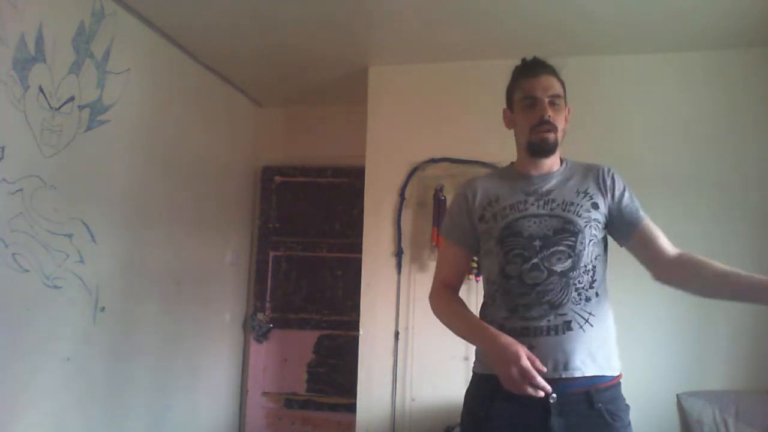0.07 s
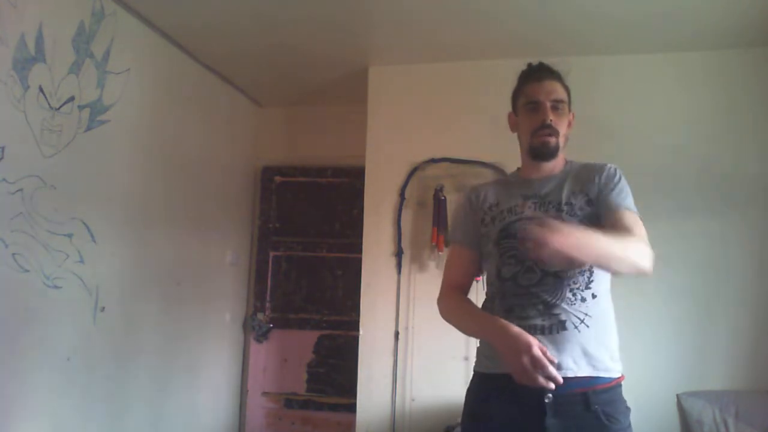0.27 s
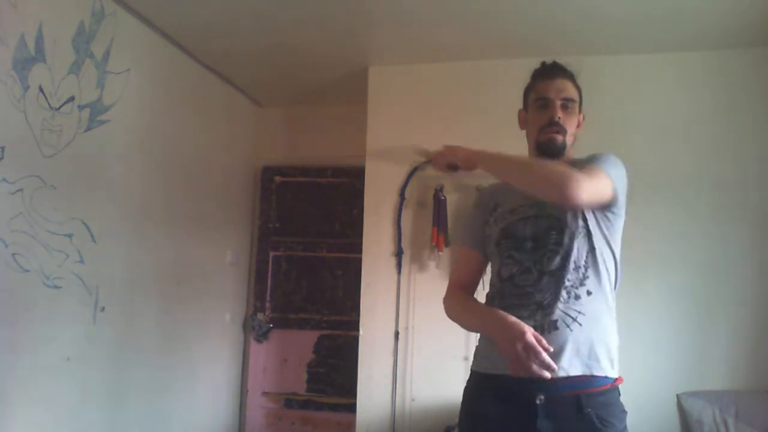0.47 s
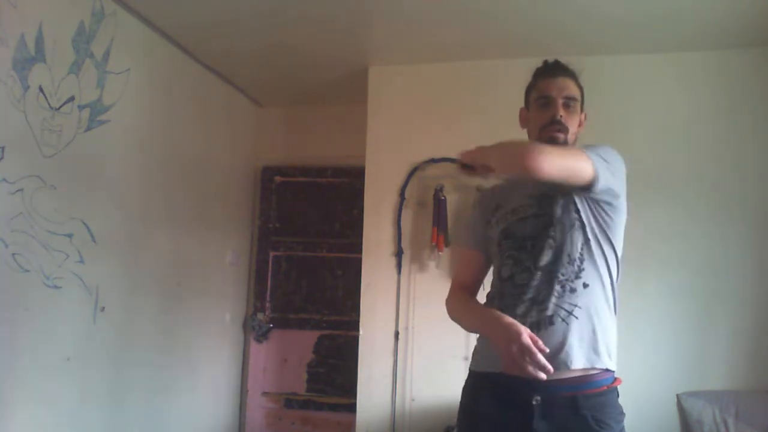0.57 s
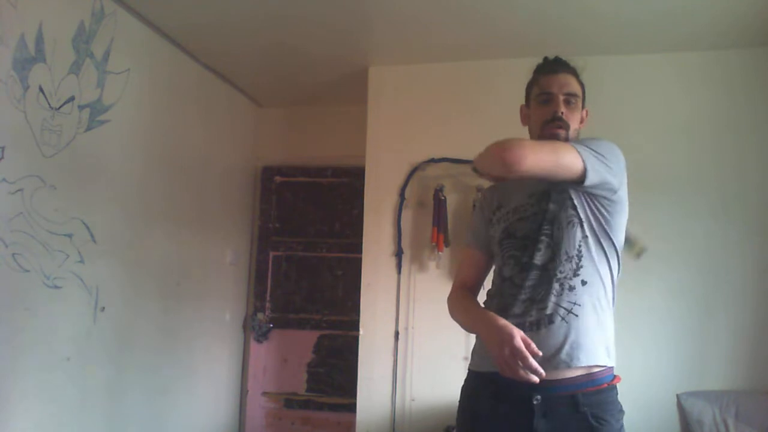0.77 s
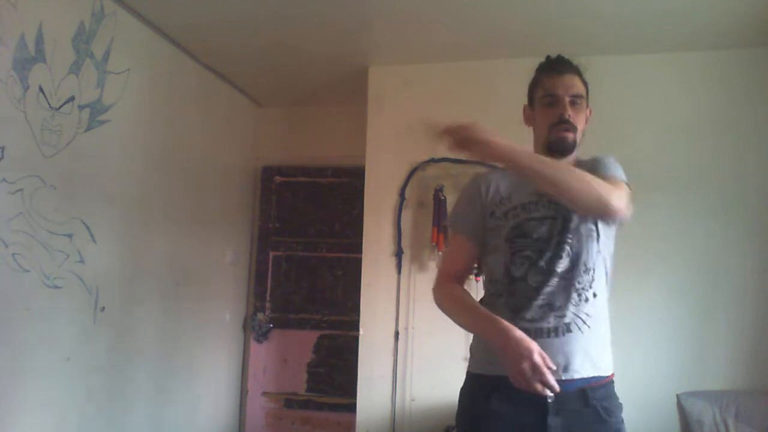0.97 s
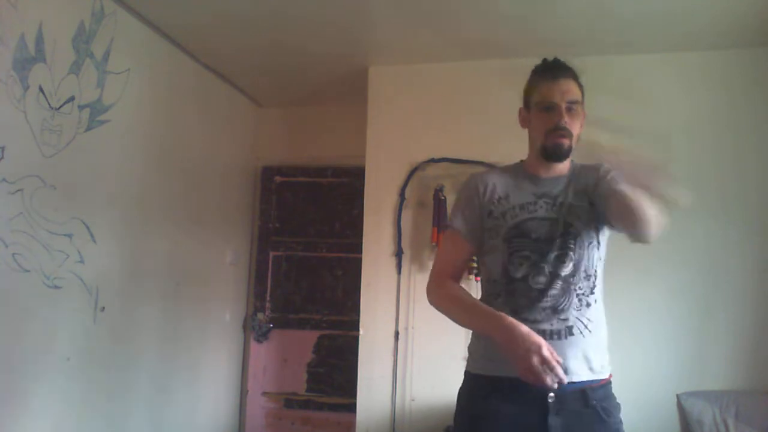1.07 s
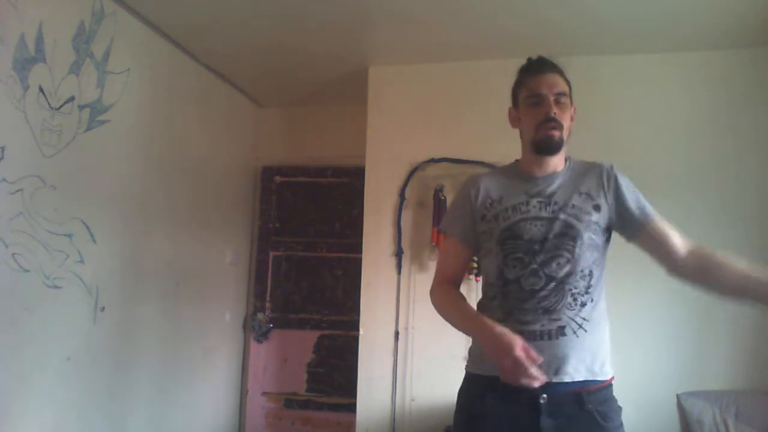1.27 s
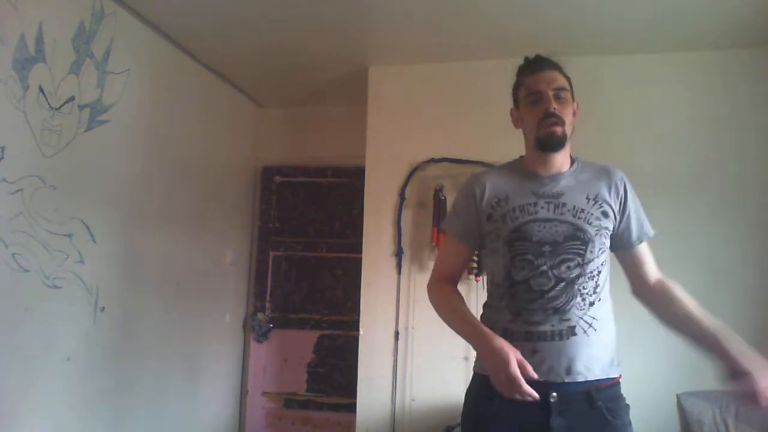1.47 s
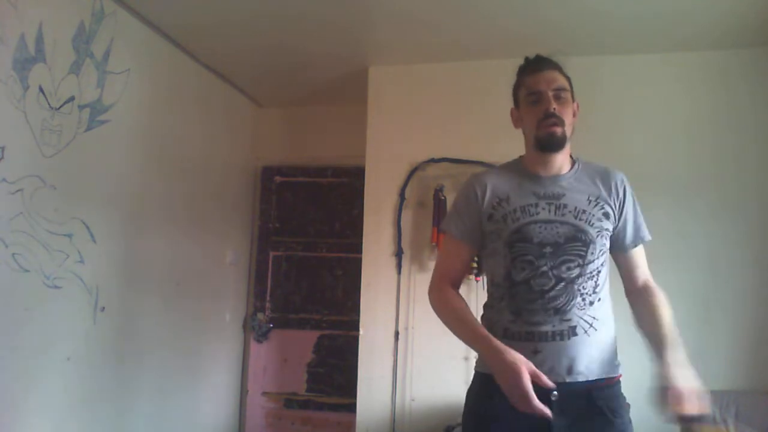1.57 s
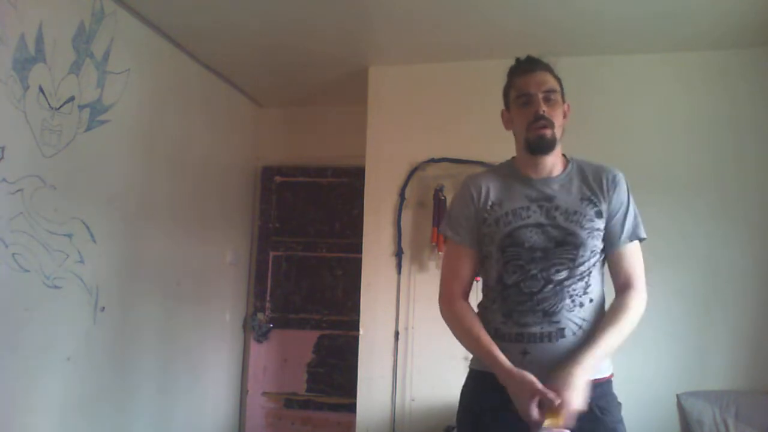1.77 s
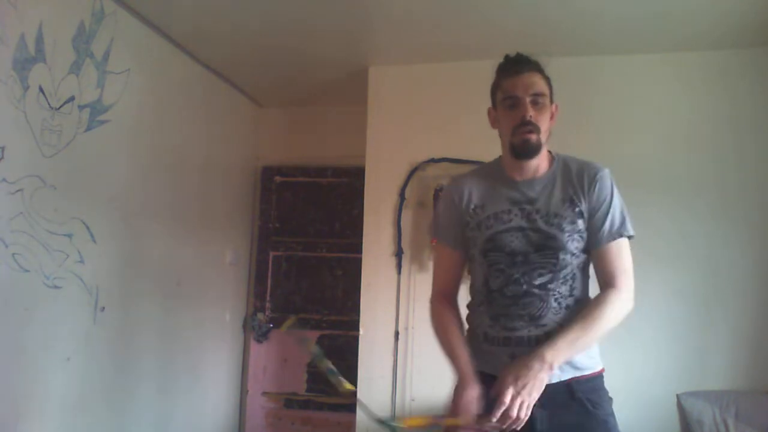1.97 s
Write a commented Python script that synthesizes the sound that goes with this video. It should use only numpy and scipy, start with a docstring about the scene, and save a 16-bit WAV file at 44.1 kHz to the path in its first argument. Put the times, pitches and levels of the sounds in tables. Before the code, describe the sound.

Nunchaku slap sharply against a shirt, then whoosh low through a small room over fan hiss

```python
"""A nunchaku slaps against a shirt, then whooshes back through the air of a small room.
Slap: noise cracks over a low thud. Whoosh: a vortex tone and wake noise that follow the stick's speed.
Cord and handles rub and tick (noise bands); soft low bumps are single pressure dips.
Behind: a fan's rush with faint tones over microphone hiss, very low rumble and a draught."""
import sys
import numpy as np
from scipy import signal
from scipy.fft import rfft, irfft
from scipy.io import wavfile
from scipy.ndimage import uniform_filter1d

SR = 44100
rng = np.random.default_rng(int(sys.argv[2]) if len(sys.argv) > 2 else 0)


def persist_wave(psi):
    """Save psi, clipped to +-1, as 16-bit WAV."""
    counts = np.round(np.clip(psi, -1, 1) * 32767).astype(np.int16)
    wavfile.write(sys.argv[1], SR, np.atleast_2d(counts).T)


N = 88596


def undb(db):
    """Decibels to gain."""
    return 10 ** (np.asarray(db) / 20)


def times():
    """Time of every sample in s."""
    return np.arange(N) / SR


def unit(x):
    """Scale to rms 1."""
    return x / np.sqrt(np.mean(x ** 2))


def bins():
    """Frequency of every spectral bin in Hz, at least 1 so that logs are finite."""
    return np.maximum(np.fft.rfftfreq(N, 1 / SR), 1)


def along_hz(points, hz):
    """Interpolate (f/Hz, value) points on a log-frequency axis."""
    point_hz, values = np.array(points, float).T
    return np.interp(np.log(hz), np.log(point_hz), values)


def filtered_noise(gain):
    """White noise shaped by a gain per spectral bin, rms 1."""
    spectrum = rfft(rng.standard_normal(N))
    return unit(irfft(spectrum * gain, N))


def noise(points):
    """Noise of rms 1 with the colour of (f/Hz, level/dB) points."""
    return filtered_noise(undb(along_hz(points, bins())))


def band(hz, octaves):
    """Noise of rms 1 in a Gaussian bell on a log-frequency axis; octaves is its sigma."""
    return filtered_noise(np.exp(-.5 * (np.log2(bins() / hz) / octaves) ** 2))


def walk(rate_hz):
    """Smooth random drift of rms 1, lowpassed around rate_hz."""
    return filtered_noise(np.exp(-(bins() / rate_hz) ** 2))


def burst(at_s, decay_s):
    """Instant attack and exponential decay."""
    age_s = times() - at_s
    return (age_s >= 0) * np.exp(-np.abs(age_s) / decay_s)


def swell(at_s, rise_s, decay_s):
    """Gaussian rise to a peak of 1, then exponential decay."""
    age_s = times() - at_s
    return np.exp(np.where(age_s < 0, -.5 * (age_s / rise_s) ** 2, -np.abs(age_s) / decay_s))


def room(x, wet_db):
    """Add the diffuse ring of a small bare room: noise that dies octave by octave."""
    # reverberation time: f/Hz, T60/s
    room_t60 = [(150, 0.34), (600, .33), (1500, 0.37), (4000, 0.21), (10000, 0.28)]
    gap_s, length_s = 0.00498, 1
    t = times()
    white = rfft(rng.standard_normal(N))
    octave = np.clip(np.log2(bins() / 125), 0, 7)
    tail = 0
    for k in range(8):
        t60_s = along_hz(room_t60, 125 * 2 ** k)
        octave_noise = irfft(white * np.maximum(1 - np.abs(octave - k), 0), N)
        tail = tail + octave_noise * np.exp(-np.log(1000) * t / t60_s)
    # flatten the broad colour of the ring
    ring = rfft(tail)
    even = ring / np.sqrt(uniform_filter1d(np.abs(ring) ** 2, size=600))
    tail = irfft(even, N) * (t > gap_s) * (t < length_s)
    tail = tail / np.sqrt(np.sum(tail ** 2))
    return x + undb(wet_db) * signal.fftconvolve(x, tail)[:N]


def background():
    """Fan rush and microphone hiss as one coloured noise, with faint wobbling fan tones."""
    # fan and hiss colour: f/Hz, relative level/dB
    floor_colour = [(30, 0.5), (70, -0.5), (130, 5), (215, -4.5), (300, -0.5), (400, -3), (470, 2),
                    (560, 1.5), (680, 0), (900, -2.5), (1200, -5.5), (1600, -9.5), (2200, -17.5),
                    (3200, -18), (4500, -21.5), (10000, -22.5), (15500, -22.5)]
    # fan tones: f/Hz, rms level/dB
    fan_lines = [(328.4, -63.5), (463, -58.5), (646, -59.5), (726.7, -59.5), (834.4, -62.5), (6573, -97),
                 (6600, -73)]
    floor_db, waver_db, waver_rate_hz = -45.5, 0.5, 5.2
    wobble, wobble_rate_hz = .004, 12  # rms wobble as a fraction of f, f capped at 1000 Hz
    tones = 0
    for hz, db in fan_lines:
        line_hz = hz + wobble * min(hz, 1000) * walk(wobble_rate_hz)
        phase = 2 * np.pi * np.cumsum(line_hz) / SR
        tones = tones + undb(db) * np.sqrt(2) * np.sin(phase)
    return undb(floor_db + waver_db * walk(waver_rate_hz)) * noise(floor_colour) + tones


def rumble():
    """Slow rumble at the microphone, plus low noise that swells as the swing's draught arrives."""
    # rumble colour: f/Hz, relative level/dB
    rumble_colour = [(3, 9), (8, 16.5), (14, 7), (22, -15.5), (40, -4.5), (80, -61), (300, -77)]
    # draught colour: f/Hz, relative level/dB
    draught_colour = [(3, -0.5), (7, 1), (13, -6), (22, -24), (40, -30), (80, -37.5), (300, -81)]
    rumble_db, draught_db = -29.5, -15
    draught_s, rise_s, decay_s = 1.11, 0.021, 0.112
    draught = undb(draught_db) * swell(draught_s, rise_s, decay_s) * noise(draught_colour)
    return undb(rumble_db) * noise(rumble_colour) + draught


def bumps():
    """Soft low bumps: each is one dip of pressure, age * exp(1 - age)."""
    # bumps: t/s, peak level/dB
    bump_table = [(0.208, -29.5), (0.294, -32), (0.639, -31), (0.828, -27), (0.859, -28), (0.930, -29),
                  (1.273, -30), (1.279, -30), (1.721, -27), (1.787, -25.5), (1.790, -28), (1.95, -28)]
    time_to_peak_s = 0.0012
    pressure = 0
    for at_s, db in bump_table:
        age = np.maximum(times() - at_s, 0) / time_to_peak_s
        pressure = pressure - undb(db) * age * np.exp(1 - age)
    return pressure


def windup():
    """Slow wind-up swing: the air is a faint low noise band that swells and fades."""
    at_s, rise_s, decay_s = .262, .04, .06
    peak_db, centre_hz, width_octaves = -40, 79, 0.54
    return undb(peak_db) * band(centre_hz, width_octaves) * swell(at_s, rise_s, decay_s)


def handling():
    """Cloth and cord rub as grainy noise bands; cord and handles tick as short bursts."""
    # rubs: t/s, level/dB, rise/s, decay/s, centre f/Hz, width/octaves
    rub_table = [(0.952, -47, 0.013, .02, 10300, 0.52), (1.08, -52, 0.055, 0.044, 9000, 0.65),
                 (1.114, -53.5, 0.024, .04, 4400, 1), (1.50, -64, .14, .17, 3250, 0.14),
                 (1.523, -49, .006, 0.017, 1510, 0.32), (1.525, -57.5, .007, 0.014, 9100, .1),
                 (1.618, -61, 0.031, 0.17, 1690, 0.13), (1.726, -54, 0.006, 0.018, 3930, 0.49),
                 (1.814, -53.5, 0.018, 0.14, 9900, 0.47), (1.868, -56, 0.074, 0.13, 4640, 0.83)]
    # ticks: t/s, level/dB, centre f/Hz
    tick_table = [(0.411, -48, 5000), (0.928, -42, 9050), (1.2593, -44, 4170), (1.515, -49, 6500),
                  (1.709, -37.5, 3800), (1.715, -46, 3300), (1.852, -42, 4200), (1.955, -50, 11600)]
    grain_db, grain_rate_hz = 1.5, 1100
    tick_decay_s, tick_octaves, room_db = 0.0033, 0.51, -3
    rubs = 0
    for at_s, db, rise_s, decay_s, hz, octaves in rub_table:
        rubs = rubs + undb(db) * swell(at_s, rise_s, decay_s) * band(hz, octaves)
    ticks = 0
    for at_s, db, hz in tick_table:
        ticks = ticks + undb(db) * burst(at_s, tick_decay_s) * band(hz, tick_octaves)
    grain = undb(grain_db * walk(grain_rate_hz))
    return room(rubs * grain + ticks, room_db)


def swing():
    """Shed vortices give a tone whose pitch follows speed; the wake noise grows steeply with speed."""
    # wake colour: f/Hz, relative level/dB
    wake_colour = [(60, 4.5), (130, 9.5), (260, 6), (400, -7.5), (600, 1.5), (1100, -6.5), (2000, -16),
                   (4000, -18.5), (8000, -28.5), (14000, -40)]
    fastest_s, speed_up_s, slow_down_s = 1.049, .06, 0.085
    top_speed_hz, pitch_wobble, wobble_rate_hz = 162.4, .055, 85
    vortex_db, octave_db, flutter_db, flutter_rate_hz = -26.5, -19, 2.5, 50
    vortex_s, vortex_half_s, vortex_room_db = 1.051, 0.034, -12
    wake_db, wake_power, air_room_db = -35.5, 4.04, -6
    pass_db, pass_s, pass_length_s, pass_hz, pass_octaves = -36.5, 1.049, 0.0065, 413, 0.86

    age_s = times() - fastest_s
    speed = 1 / np.hypot(1, age_s / np.where(age_s < 0, speed_up_s, slow_down_s))  # peak 1
    vortex_hz = top_speed_hz * speed * (1 + pitch_wobble * walk(wobble_rate_hz))
    phase = 2 * np.pi * np.cumsum(vortex_hz) / SR
    tone = unit(np.sin(phase) + undb(octave_db) * np.sin(2 * phase))
    flutter = undb(flutter_db * walk(flutter_rate_hz))
    vortex_envelope = np.exp(-((times() - vortex_s) / vortex_half_s) ** 4)
    vortex = undb(vortex_db) * tone * flutter * vortex_envelope

    wake = undb(wake_db) * noise(wake_colour) * speed ** wake_power
    # rush of air as the stick passes closest
    rush = undb(pass_db) * band(pass_hz, pass_octaves) * swell(pass_s, pass_length_s, pass_length_s)
    return room(vortex, vortex_room_db) + room(wake + rush, air_room_db)


def slap():
    """The stick wraps onto the shirt in a quick run of noise cracks; the body thuds under them."""
    # stick contacts: t/s, level/dB
    contacts = [(0.7344, -22.5), (0.7375, -23.5), (0.7459, -22), (0.7508, -29.5)]
    # crack colour: f/Hz, relative level/dB
    crack_colour = [(100, 19), (400, 12.5), (900, 7.5), (1800, 0), (2800, -0.5), (4000, -4.5), (6000, 1),
                    (10000, -0.5), (12000, -3), (14000, -6)]
    # body thud colour: f/Hz, relative level/dB
    thud_colour = [(20, 2), (55, 7.5), (110, -8.5), (170, -5.5), (260, -31), (600, -37)]
    contact_decay_s, room_db = 0.0018, -1
    thud_db, thud_s, rise_s, decay_s = -22.5, .757, .012, 0.031
    envelope = sum(undb(db) * burst(at_s, contact_decay_s) for at_s, db in contacts)
    cracks = noise(crack_colour) * envelope
    thud = undb(thud_db) * noise(thud_colour) * swell(thud_s, rise_s, decay_s)
    return room(cracks, room_db) + thud


def scene():
    """Sum of all layers; the microphone's treble roll-off acts on slap, swing, handling and bumps."""
    mic_top_hz = 12300
    mic = signal.butter(6, mic_top_hz, fs=SR, output="sos")
    events = signal.sosfilt(mic, bumps() + handling() + swing() + slap())
    return (background() + rumble() + windup() + events)[None]


def record(dry):
    """The recorder cuts the top steeply and sits a little off zero."""
    top_hz, dc_offset = 15750, -.077
    lowpass = signal.ellip(12, .1, 80, top_hz, fs=SR, output="sos")
    return signal.sosfilt(lowpass, dry) + dc_offset


dry = scene()
out = record(dry)
persist_wave(out)
```